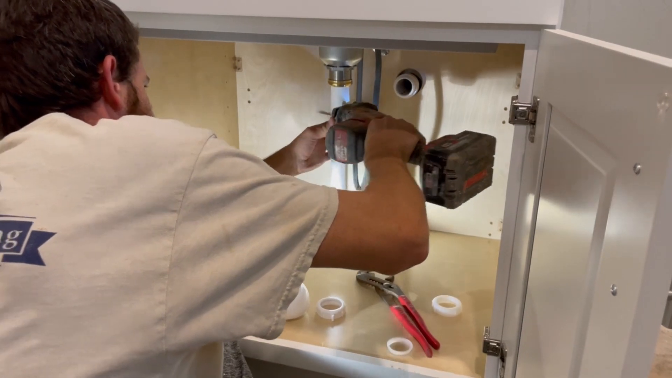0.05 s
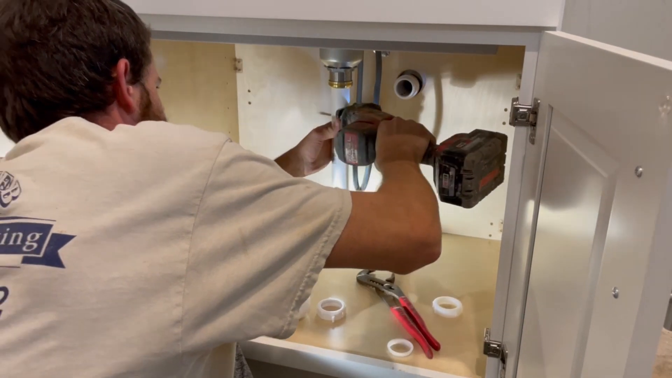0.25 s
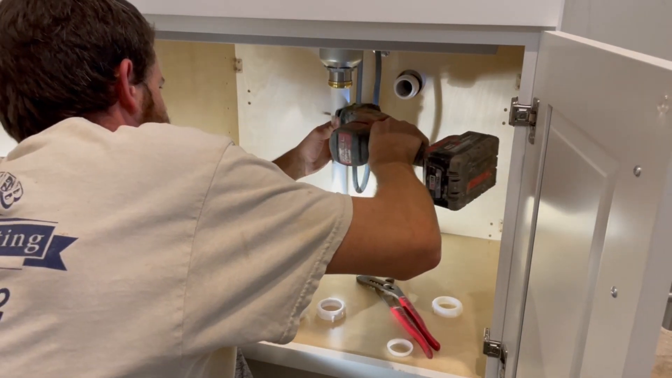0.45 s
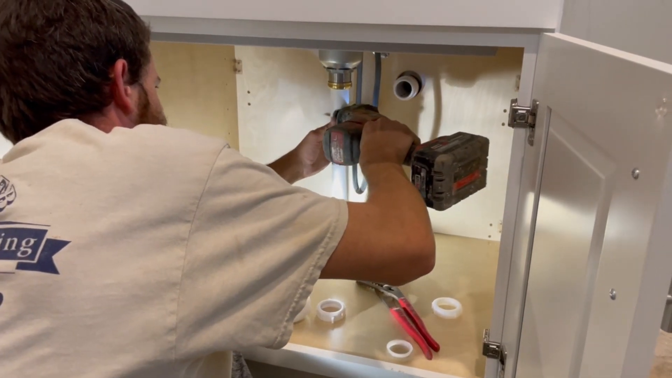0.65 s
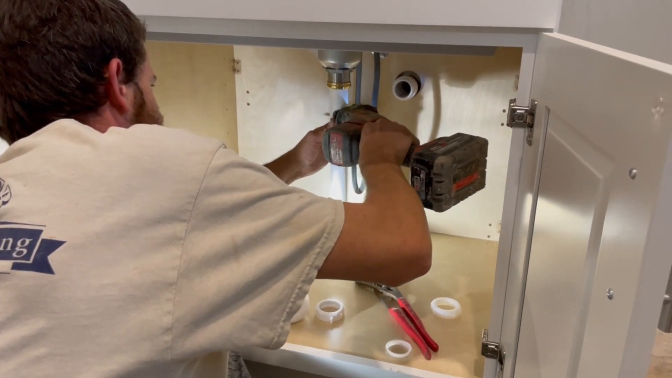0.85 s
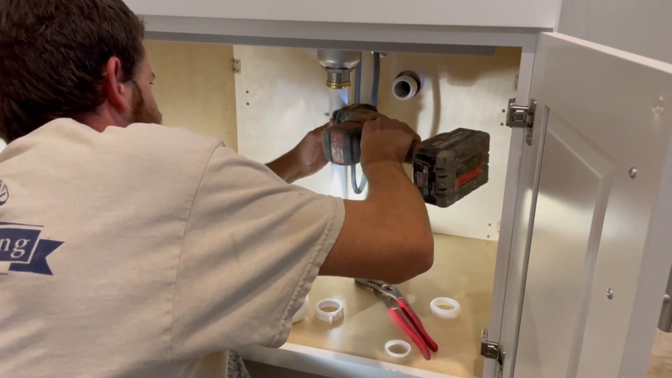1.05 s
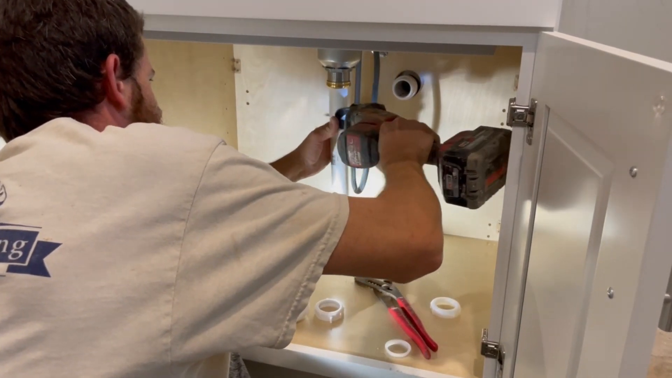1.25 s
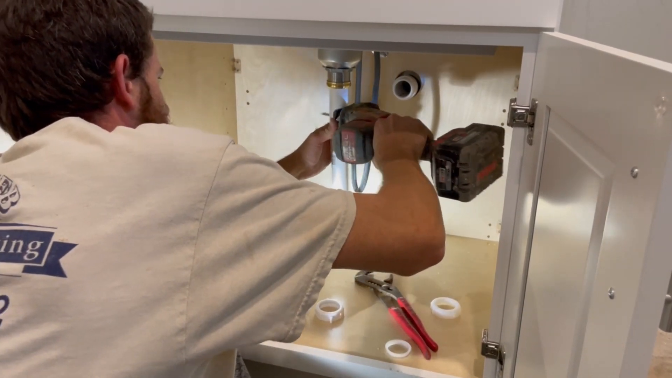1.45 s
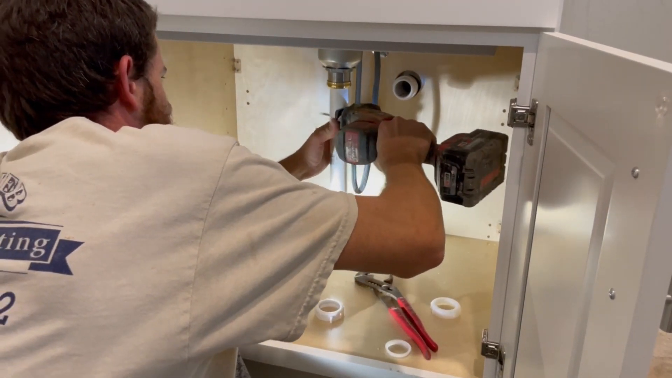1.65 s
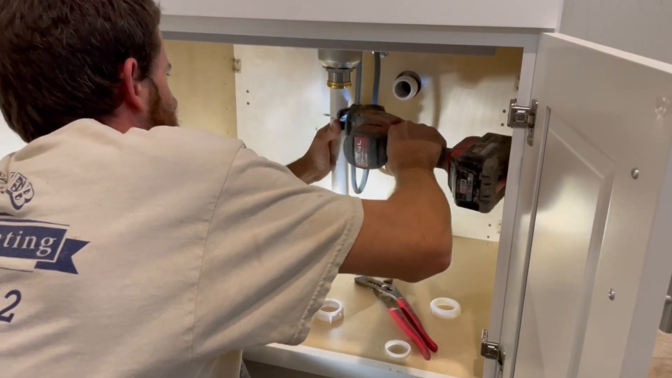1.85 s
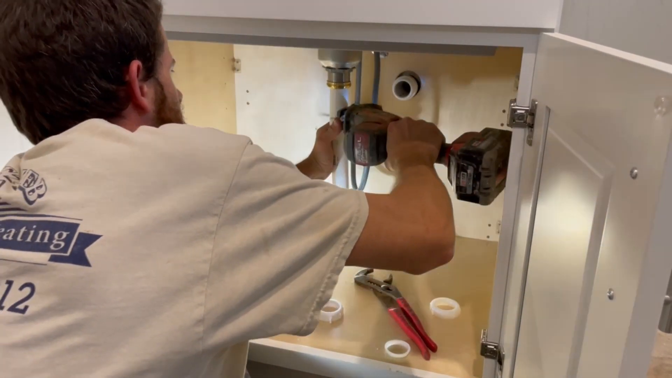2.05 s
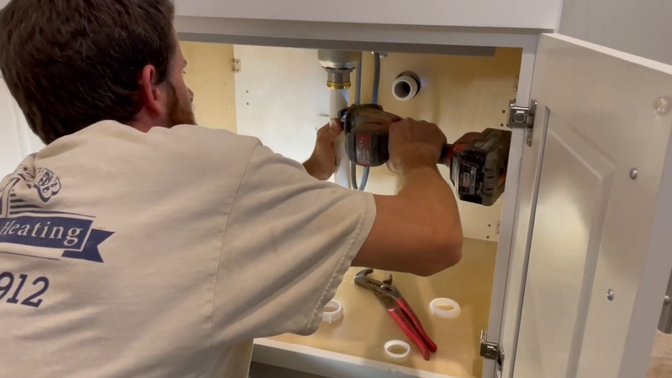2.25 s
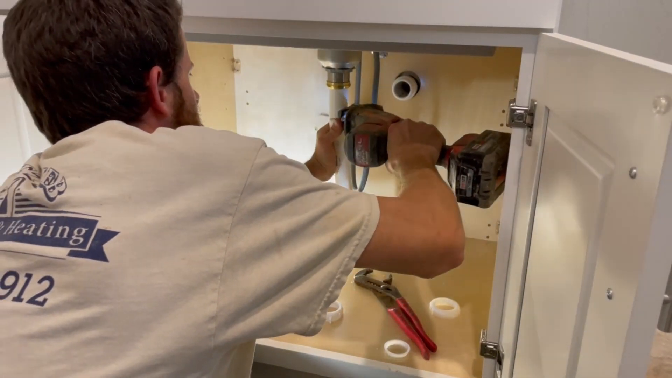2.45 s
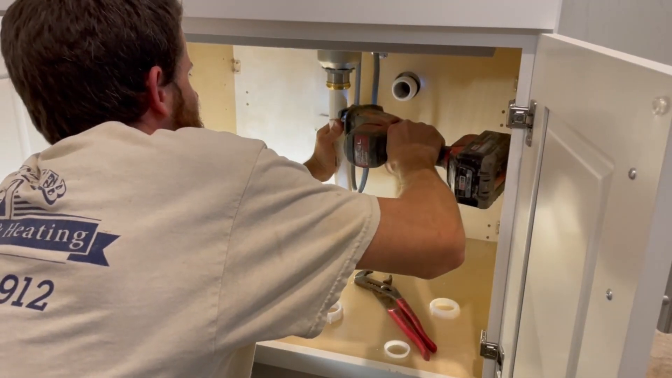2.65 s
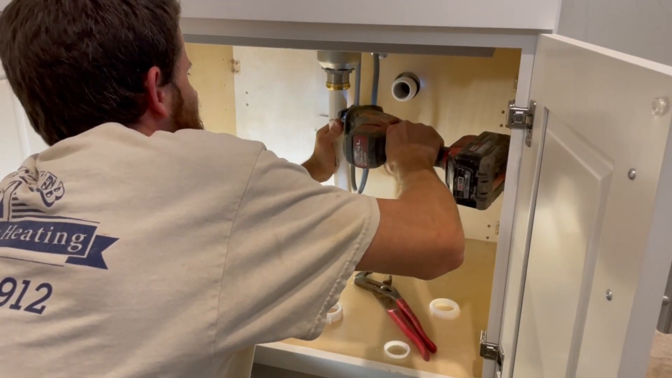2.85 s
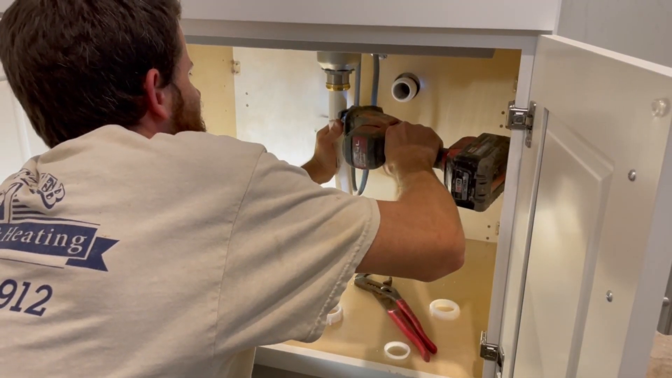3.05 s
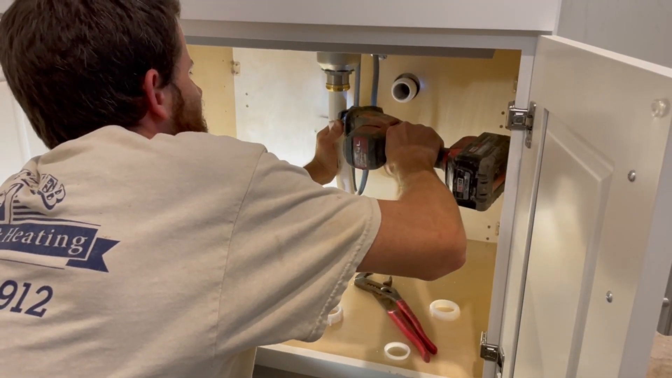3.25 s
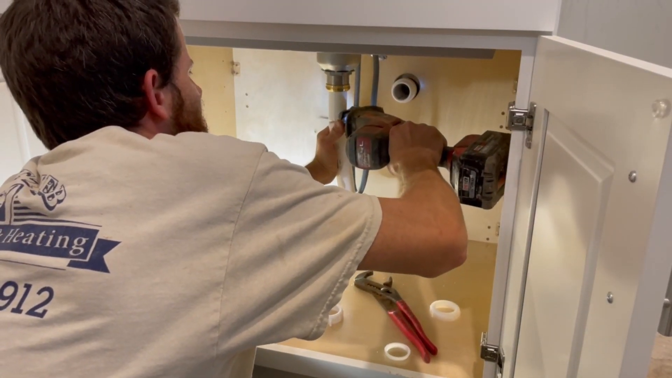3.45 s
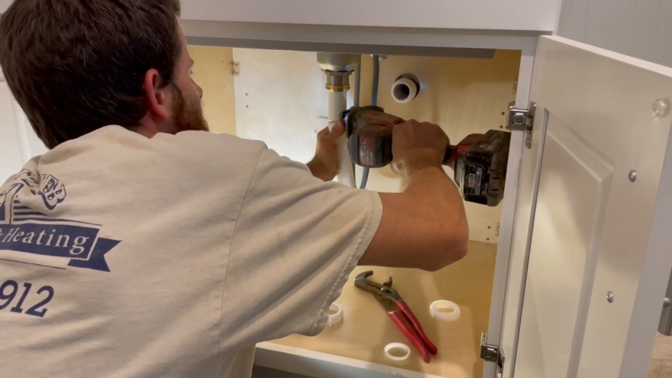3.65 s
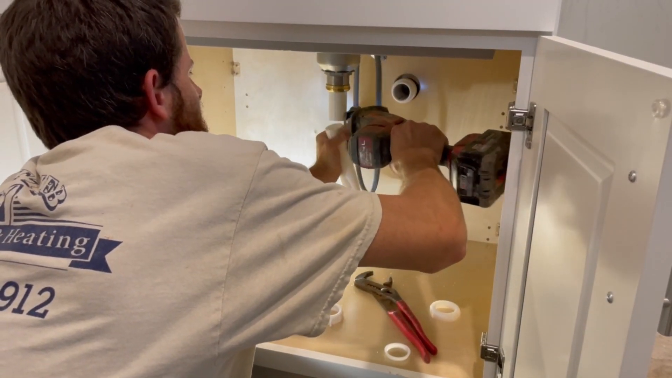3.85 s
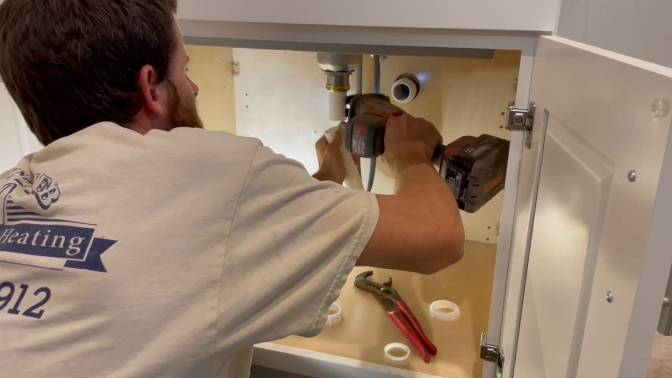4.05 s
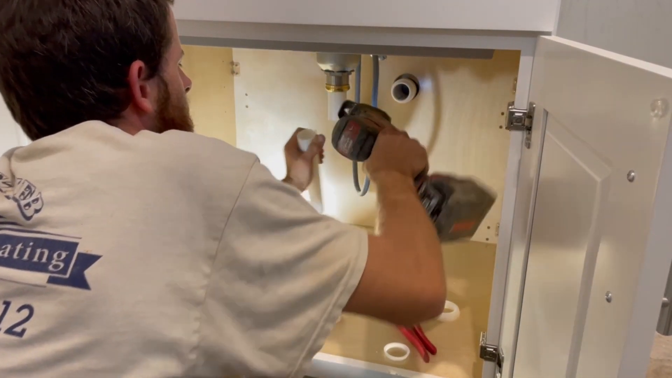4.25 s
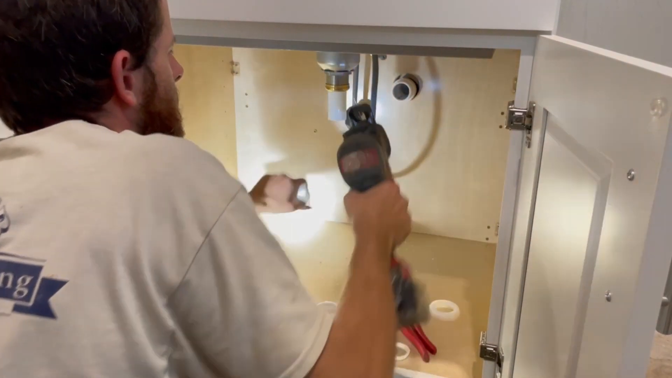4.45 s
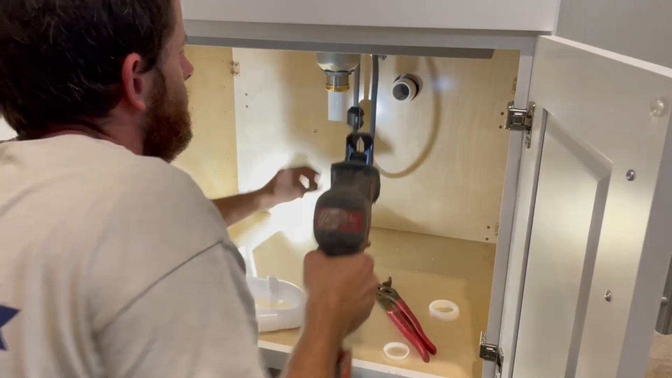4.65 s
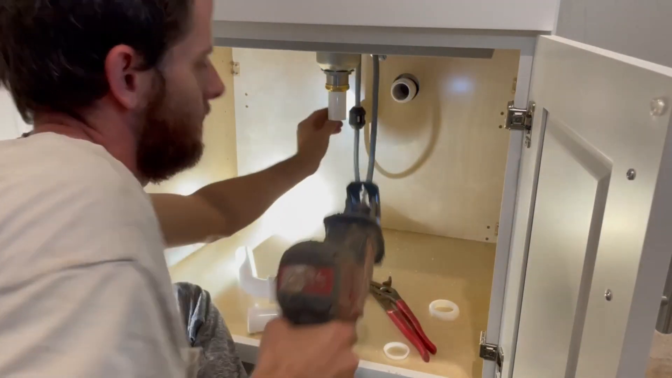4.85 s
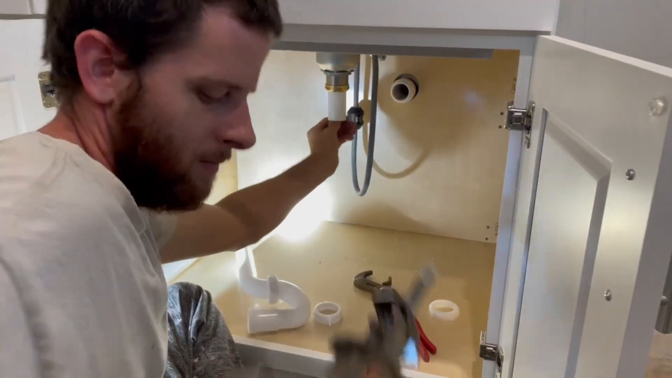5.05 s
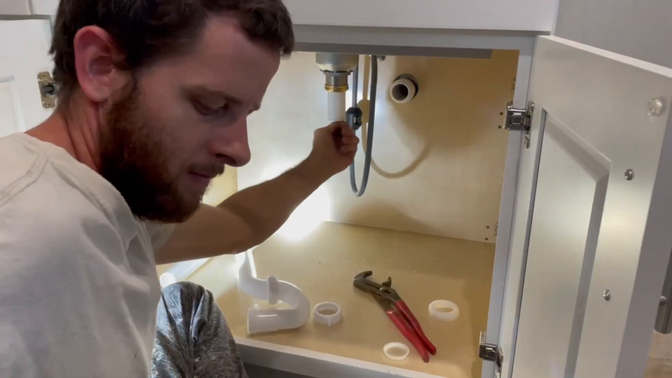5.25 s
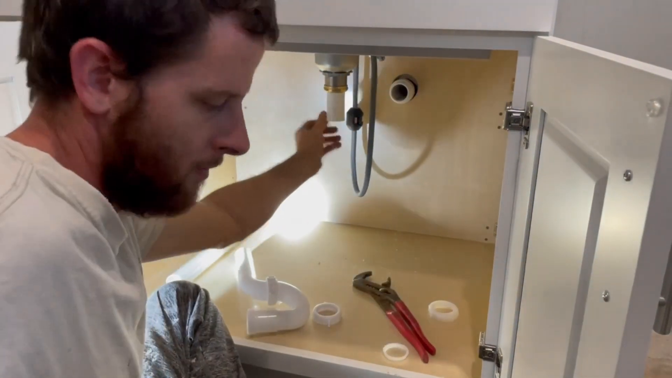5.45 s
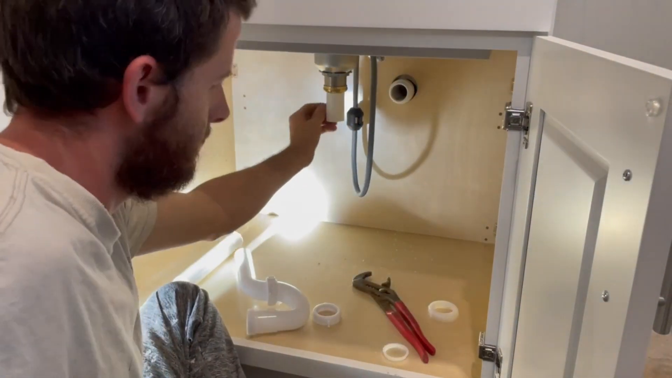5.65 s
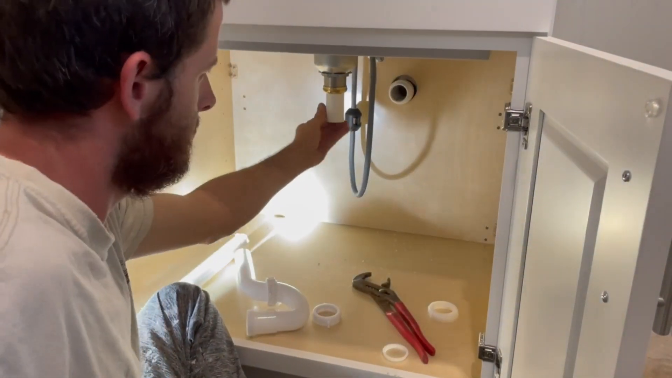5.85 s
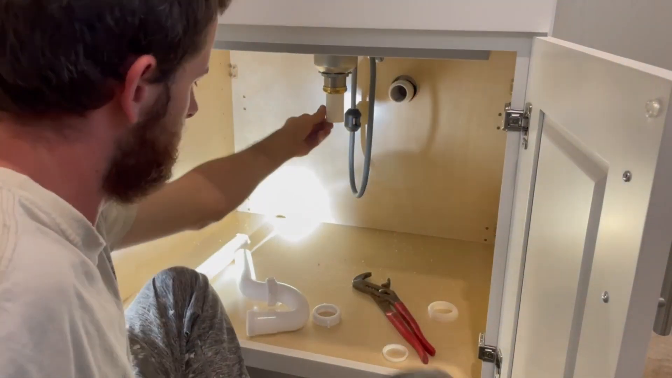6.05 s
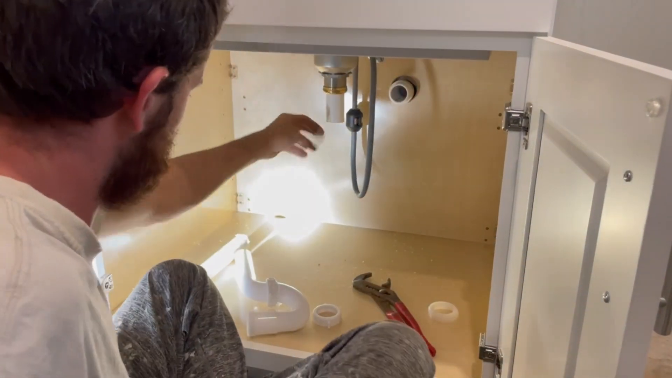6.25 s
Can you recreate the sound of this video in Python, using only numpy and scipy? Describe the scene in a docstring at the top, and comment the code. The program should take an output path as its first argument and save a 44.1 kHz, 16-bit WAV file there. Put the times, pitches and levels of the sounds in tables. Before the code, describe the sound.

A cordless reciprocating saw buzzes and rasps through a plastic drain pipe inside a wooden cabinet, sags, cuts off, then knocks on wood and a fingernail snap.

```python
"""A buzzing, rasping reciprocating saw cuts a plastic drain pipe in a wooden sink cabinet, sags and stops.
Tones at orders of the stroke shake pipe and cabinet; noise puffed twice a stroke makes the teeth's rasp and hiss.
Low lurches are decaying sines. The off-cut and the saw then knock on wood as struck modes, and noise
scrapes and a short tone make fingers picking and snapping at the pipe end.
Clothes and hands stir as filtered noise, and the small room rings briefly after each sound."""
import sys
import numpy as np
from scipy import signal
from scipy.fft import rfft, irfft, next_fast_len
from scipy.io import wavfile
from scipy.ndimage import uniform_filter1d

SR = 44100
rng = np.random.default_rng(int(sys.argv[2]) if len(sys.argv) > 2 else 0)


def output_pcm(signal):
    """Save a mono or channel-first signal as 16-bit PCM at the path in sys.argv[1].

    Samples are clipped to [-1, 1] before scaling.
    """
    pcm = np.clip(np.atleast_2d(signal).T, -1, 1) * 32767
    wavfile.write(sys.argv[1], SR, np.round(pcm).astype(np.int16))


N = 278271
TIME = np.arange(N) / SR


def amp(db):
    """dB to gain."""
    return 10 ** (np.asarray(db) / 20)


def evened(x):
    """Scales to rms 1."""
    return x / np.sqrt(np.mean(x ** 2) + 1e-20)


def read(points, hz):
    """Reads a (f/Hz, value) table on a log frequency axis."""
    f, value = np.transpose(points)
    return np.interp(np.log(hz + 1), np.log(f + 1), value)


def columns(rows):
    """Turns timed rows into curves, one value a sample, held beyond the ends."""
    s, *values = np.transpose(rows)
    return [np.interp(TIME, s, v) for v in values]


def colour(x, spectrum):
    """Filters to a spectrum; white noise keeps its rms."""
    size = next_fast_len(N, True)
    gain = amp(read(spectrum, np.fft.rfftfreq(size, 1 / SR)))
    return irfft(rfft(x, size) * evened(gain), size)[:N]


def drift(hz):
    """Slow random wander of rms 1, up to about hz."""
    steps = rng.standard_normal(int(N / SR * 60) + 2)
    smooth = signal.lfilter([1], [1, -np.exp(-2 * np.pi * hz / 60)], steps)
    return evened(np.interp(TIME * 60, np.arange(len(steps)), smooth))


def ring(x, hz, width):
    """A resonance of gain 1 at hz, steady or moving: shifts hz to zero, smooths, shifts back."""
    turn = np.exp(2j * np.pi * np.cumsum(hz * np.ones(N)) / SR)
    r = np.exp(-np.pi * width / SR)
    return 2 * (turn * signal.lfilter([1 - r], [1, -r], x / turn)).real


def add(mix, s, sound):
    """Mixes a sound in at s seconds."""
    part = mix[round(s * SR):][:len(sound)]
    part += sound[:len(part)]


JOLT_LEAD = .3  # phase of the low orders, in cycles


def order(turns, k, db, waver_db, unsteady):
    """One order of the stroke, wavering in level and phase; orders to 5 share a phase and add up to one jolt."""
    lead = JOLT_LEAD + (k > 5) * rng.random()
    level = np.sqrt(2) * amp(db + unsteady * waver_db * drift(6.0))
    return level * np.cos(2 * np.pi * (k * turns + lead + 0.019 * unsteady * drift(1.5)))


# Saw motor: t/s, stroke f/Hz, double-stroke shake level/dB, base level of the other orders/dB
SAW = [(0.0, 47.82, -26.5, -32.5), (0.55, 47.8, -21, -32.5), (0.74, 46.74, -29, -33.5),
       (0.99, 49.37, -22, -32.5), (1.19, 48.6, -18, -35.5), (1.3, 48.36, -29.5, -37),
       (1.46, 37.93, -16.5, -38.5), (1.57, 38.5, -30, -38.5), (1.63, 38.44, -17.5, -41),
       (1.7, 43, -43, -41.5), (1.8, 45.76, -17.5, -32.5), (1.915, 45.7, -34.5, -37.5),
       (2.0, 44.77, -27.5, -39), (2.12, 46.1, -23.5, -37.5), (2.29, 49.45, -32, -37),
       (3.0, 50.1, -22, -33.5), (3.47, 49.5, -17.5, -32.5), (3.9, 49.45, -25.5, -34),
       (3.97, 49.3, -41.5, -47), (4.11, 42.6, -27.5, -37), (4.24, 42.24, -29.5, -31.5)]
# How loosely the pipe is held: t/s, rattle level change/dB, share of the wavering
GRIP = [(0, 0.5, 0.44), (1.25, 1.5, 0.71), (1.45, 0, 1.9), (2.2, 3.5, 0.73), (2.45, -2, 0.27),
        (3.8, 3, 0.32), (3.95, 1.5, 0.93), (4.2, -1.5, 1.13)]
# Buzz: order of the stroke, level over the base/dB, gain as the cut deepens/dB per s, wavering/dB
ORDERS_BUZZ = [(1, -2.5, 2, 2), (3, 10.5, -2, 1.5), (4, -1, -2, 3.5), (5, -3.5, -0.5, 4), (6, -11, -1, 5),
               (7, -20, -0.16, -1.5), (8, -3.5, -0.5, 2), (9, -4.5, 0.4, 3), (10, -11.5, -0.1, 3.5),
               (11, -15.5, 2.3, -3.5), (12, -4.5, -1.5, 1)]
# One order sings out for a while: middle t/s, length/s, order, level gain at the middle/dB
SWELLS = [(1.0595, 0.63, 5, 13), (1.24, 0.39, 4, 12.5), (1.4, 0.18, 3, 11), (1.811, 0.4, 4, 10),
          (2.9, 1.4, 5, 6.5), (2.515, 0.77, 8, 11), (2.95, 1.8, 9, 4.5), (3.62, 0.7, 7, 26),
          (3.736, 0.37, 8, 16), (4, 0.79, 4, 12), (4.13, 0.087, 3, 13.5), (1.1, 0.45, 8, 8),
          (0.097, 1, 8, 7.5), (1.64, 0.3, 3, 9), (3.2, 0.9, 6, 10), (4.11, .14, 5, 10.5),
          (3.76, 0.41, 12, 12), (2.7, 1.1, 10, 12), (1.8, 0.16, 9, 6.5)]
# Loose rattle spectrum: f/Hz, relative level/dB per Hz
RATTLE = [(35, -31), (60, -3), (120, -1.5), (300, -10), (400, -3.5), (650, -12), (900, -26.5)]
RATTLE_DB, RATTLE_DB_PER_S = -24, -2  # at t = 0 before grip; the pipe rattles less as the cut deepens


def shake():
    """The blade reverses twice a stroke and shakes pipe and cabinet at orders of the stroke."""
    hz, double_db, buzz_db = columns(SAW)
    turns = np.cumsum(hz) / SR
    rattle_db, unsteady = columns(GRIP)
    tones = order(turns, 2, double_db, 0.55, unsteady)
    for k, db, gain_db, waver_db in ORDERS_BUZZ:
        swell_db = sum(top_db * np.cos(np.pi * np.clip((TIME - s) / length, -.5, .5)) ** 2
                       for s, length, which, top_db in SWELLS if round(which) == round(k))
        order_db = buzz_db + db + gain_db * TIME + swell_db
        tones += order(turns, round(k), order_db, waver_db, unsteady)
    # the loose pipe also rattles out of step
    loose_gain = amp(RATTLE_DB + RATTLE_DB_PER_S * TIME + rattle_db)
    loose = loose_gain * colour(rng.standard_normal(N), RATTLE)
    stopping = np.clip((SAW[-1][0] - TIME) / 0.12, 0, 1)
    return hz, turns, (tones + loose) * stopping


# Rasp spectrum: f/Hz, relative level/dB per Hz
RASP = [(400, -30), (650, -6.5), (1300, -8), (2400, -9), (3500, -10.5), (5500, -13.5), (6500, -9),
        (8000, -23.5)]
# Hiss spectrum: f/Hz, relative level/dB per Hz
HISS = [(4500, -32), (6000, -8), (7500, 4), (8300, 5), (9000, -1.5), (10300, 3), (12500, -4),
        (15800, -21.5)]
# Spectrum of the scratch through the outer wall: f/Hz, relative level/dB per Hz
BITE = [(1200, -7), (2300, 0), (3000, -9.5), (3900, -4), (4500, -1), (5500, -16.5), (7000, -30)]
# Pipe modes: centre f/Hz, width/Hz, relative level/dB
PIPE = [(1425, 70, -7), (1535, 32, 1), (1640, 35, -5), (1980, 60, -4), (2707, 54, -13.5), (1044, 42, -8.5),
        (4430, 180, -10)]
RASP_DB, HISS_DB = -26.5, -27  # at full speed, t = 0
HISS_DB_PER_S = -0.37  # the hiss eases as the cut deepens
SAG_BELOW_HZ = 47.7  # slower strokes than this lose level
RASP_SAG_DB, HISS_SAG_DB = 0.4, 0.7  # lost per stroke a second of sag
FIRST_BITE_DB, FIRST_BITE_S = -29.5, 0.55  # a brighter scratch while the teeth cross the outer wall
WALL_DB, WALL_DB_PER_S = -5, 1  # pipe modes under 1800 Hz ring more as the wall thins
PINCH_S, PINCH_LENGTH_S, PINCH_DB = 1.28, 0.06, -10.5  # the kerf pinches the blade and lowers the hiss
RELEASE_S, RELEASE_SOFT_S = 4.085, 0.027  # trigger let go
RASP_FALL_DB_PER_S, HISS_FALL_DB_PER_S = 379, 394.5
WANDER = .004  # the pipe modes shift by this share (rms) as the cut opens and closes


def teeth(hz, turns):
    """Teeth puff noise hardest on the pull, less on the push, and ring the pipe; bites differ in strength."""
    sag = np.clip(SAG_BELOW_HZ - hz, 0, None) * (TIME < RELEASE_S - .1)
    coast = RELEASE_SOFT_S * np.logaddexp(0, (TIME - RELEASE_S) / RELEASE_SOFT_S)  # s since release, soft start
    rasp_db = RASP_DB - RASP_SAG_DB * sag - RASP_FALL_DB_PER_S * coast
    hiss_db = HISS_DB + HISS_DB_PER_S * TIME + 1.3 * drift(2.9)
    hiss_db -= HISS_SAG_DB * sag + HISS_FALL_DB_PER_S * coast
    hiss_db += PINCH_DB * np.exp(-((TIME - PINCH_S) / PINCH_LENGTH_S) ** 2)
    wall_db = WALL_DB + WALL_DB_PER_S * TIME
    # one random strength for each half stroke
    halves = (2 * turns).astype(int)
    bite_db = uniform_filter1d(rng.standard_normal(halves[-1] + 1)[halves], 150)
    pull = np.exp(3.2 * (np.cos(2 * np.pi * (turns - .22)) - 1))
    push = np.exp(7.7 * (np.cos(2 * np.pi * (turns - .75)) - 1))
    # single teeth catching make the noise spiky
    catches_db = 3.4 * np.minimum(rng.exponential(1, (2, N)), 4)
    chips = rng.standard_normal((2, N)) * amp(catches_db)
    puffs = chips[0] * (1 + 0.65 * pull + 0.6 * push) * amp(.8 * bite_db)
    outer = amp(FIRST_BITE_DB) * np.exp(-(TIME / FIRST_BITE_S) ** 2) * evened(colour(puffs, BITE))
    pipe = np.zeros(N)
    for f, width, db in PIPE:
        mode_gain = amp(db + wall_db * (f < 1800) + 1.5 * drift(4.0))
        pipe += mode_gain * evened(ring(puffs, f * (1 + WANDER * drift(1.5)), width))
    rasp = evened(colour(puffs, RASP)) + .4 * pipe
    hiss_puffs = chips[1] * (1 + 1.3 * pull + 0.2 * push) * amp(1.3 * bite_db)
    hiss = evened(colour(hiss_puffs, HISS))
    return outer + amp(rasp_db) * rasp + amp(hiss_db) * hiss


# Clothes and hands moving: t/s, rumble level/dB, rustle level/dB
STIR = [(4.2, -45.5, -62), (5.13, -54.5, -59.5), (5.57, -61.5, -75), (6.31, -65, -66)]
# Rumble spectrum: f/Hz, relative level/dB per Hz
RUMBLE = [(30, -35.5), (60, 10.5), (90, 17.5), (125, 5), (250, -9), (400, -44.5)]
# Rustle spectrum: f/Hz, relative level/dB per Hz
RUSTLE = [(150, -28.5), (250, -6), (500, -7.5), (900, -18), (1500, -12.5), (3100, -27), (15800, -39)]


def stir():
    """Clothes and hands move as low rumble and soft rustle, two noises drifting in level."""
    rumble_db, rustle_db = columns(STIR)
    rumble = amp(rumble_db + 0.85 * drift(8.0)) * colour(rng.standard_normal(N), RUMBLE)
    rustle = amp(rustle_db + 3.7 * drift(12.0)) * colour(rng.standard_normal(N), RUSTLE)
    return rumble + rustle


# The blade binds and jerks the cabinet: t/s, level/dB, f/Hz
JERKS = [(1.361, -18.5, 87), (1.549, -18, 63), (1.621, -20, 71.5), (1.999, -12.5, 65.9), (3.895, -10, 75),
         (4.09, -20, 73.2)]
JERK_T60_S = .18


def jerks():
    """Low sine lurches that swell over a few ms and die away."""
    t, out = TIME[:SR // 3], np.zeros(N)
    for s, db, hz in JERKS:
        swell = 1 - np.exp(-t / 0.0049)
        add(out, s, amp(db - 60 * t / JERK_T60_S) * swell * np.sin(2 * np.pi * hz * t))
    return out


# The blade ticks free of the cut: t/s, level/dB, scrape decay/s
BLADE_TICK = (4.418, -50.5, 0.021)
# Blade modes: f/Hz, width/Hz, relative level/dB
BLADE = [(4620, 1100, -4), (8350, 90, 4), (10100, 2200, 4), (11800, 70, 0)]


def blade_tick():
    """A faint bright noise scrape that rings the blade."""
    s, db, scrape = BLADE_TICK
    t, out = TIME[:SR // 8], np.zeros(N)
    add(out, s, (1 - np.exp(-t / 0.0037)) * np.exp(-t / scrape) * rng.standard_normal(len(t)))
    modes = sum(amp(mode_db) * ring(out, hz, width) * np.sqrt(SR / width / 4)  # evens out the widths
                for hz, width, mode_db in BLADE)
    return amp(db) * modes


# Off-cut and saw strike wood: t/s, level/dB, thud over level/dB, clack over level/dB
KNOCKS = [(4.619, -29, 2.5, -3), (4.627, -21.5, 8, -19.5), (4.646, -29, -9, -1.5), (4.686, -33, 3, -15),
          (4.711, -25.5, -17.5, -13.5), (4.818, -38, -11, -10), (4.837, -42, -2, -9), (4.865, -33, -7, -7),
          (4.874, -26.5, -6.5, -5), (4.885, -21, -3.5, -3.5), (4.897, -24, -0.5, -25),
          (4.921, -29.5, 3.5, -11.5), (5.034, -22.5, -8.5, -6), (5.047, -24.5, -3, -29),
          (5.119, -33, 5, -20), (5.165, -35.5, 3, -10), (5.193, -39, 2.5, -18), (5.375, -57, 11.5, 0)]
# Wood modes, the first two for the thud: f/Hz, relative level/dB, t60/s
WOOD = [(145, 0, .26), (248, -13, .2), (340, -8, .03), (450, -4, .025), (580, 0, .022), (750, 0, .018),
        (1000, -3, .012)]
# Clack spectrum: f/Hz, relative level/dB per Hz
CLACK = [(600, -16), (1300, -3.5), (2000, -4), (2900, -9.5), (4000, -20), (6000, -30.5)]
# Ringing of the hard rim: f/Hz, width/Hz, level over the clack/dB
HARD = [(2820, 130, 9.5), (3520, 130, 2)]
# Tick spectrum: f/Hz, relative level/dB per Hz
TICK = [(3000, -11.5), (4600, 0), (6500, 1), (12000, -10.5), (15800, -33)]
BODY_DB, TICK_DB = -19.5, -11  # upper wood modes over the knock level; tick over the clack


def knocks():
    """A blow thuds in the low modes; its cluster of jolts rings the rest, each piece struck tuned its own way."""
    t = TIME[:SR // 4]
    jolts = rng.standard_normal((len(KNOCKS), 3, len(t)))
    bounces = uniform_filter1d(rng.standard_normal((len(KNOCKS), 1, len(t))), 60)
    jolts *= amp(3.5 * evened(bounces) - 1.5)
    pieces = rng.standard_normal((len(KNOCKS), 2, len(WOOD), 1))
    hz, mode_db, t60 = np.transpose(WOOD)[:, :, None]
    thud = (amp(mode_db - 60 * t / t60) * np.sin(2 * np.pi * hz * t))[:2].sum(0)
    wood, clack, tick = np.zeros((3, N))
    fade = (1 - np.exp(-t / 0.00099)) * np.exp(-t / 0.011)
    crack = (1 - np.exp(-t / 0.0016)) * np.exp(-t / 0.0097)  # hard contact: softer start, sooner gone
    push = np.hanning(220) * np.sin(2 * np.pi * np.arange(220) / 220) / 110
    for (s, db, thud_db, clack_db), jolt, (louder, higher) in zip(KNOCKS, jolts, pieces):
        decay = amp(mode_db + 2.5 * louder - 60 * t / t60)
        modes = decay * np.sin(2 * np.pi * hz * (1 + .07 * higher) * t)
        body = evened(signal.oaconvolve(fade * jolt[0], modes[2:].sum(0)))
        add(wood, s, amp(db + thud_db) * np.convolve(push, thud))
        add(wood, s, amp(db + BODY_DB) * body)
        add(clack, s, amp(db + clack_db) * crack * jolt[1])
        add(tick, s, amp(db + clack_db + TICK_DB) * crack * jolt[2])
    hard = sum(amp(db) * ring(clack, f, width) for f, width, db in HARD)
    return wood + colour(clack, CLACK) + hard + colour(tick, TICK)


# Fingers picking at the cut end: t/s, level/dB, scrape decay/s, fitting knock over level before halving/dB
SNAPS = [(5.992, -60, 0.043, -10), (6.083, -46, 0.005, -25), (6.088, -29.5, 0.0036, 12.5),
         (6.093, -34.5, 0.012, 0), (6.099, -40, 0.033, 1), (6.252, -54, .006, -30)]
# Fingernail spectrum: f/Hz, relative level/dB per Hz
SNAP = [(120, -23), (400, -16), (950, -14), (2000, -13.5), (4000, -19), (6500, -15), (10000, -14.5),
        (15800, -21)]
# Rim modes rung by nail and knock: f/Hz, width/Hz, level/dB
RIM = [(170, 70, 10), (400, 200, 2), (4600, 40, 9), (8500, 90, 5), (10600, 90, 5)]


def snaps():
    """Fingernail noise scrapes and one sharp snap ring the rim; a firm touch also knocks the fitting."""
    t, (fitting, nail) = TIME[:SR // 8], np.zeros((2, N))
    knock = np.cos(2 * np.pi * 980 * t) * np.exp(-t / .0018) * (1 - np.exp(-t / .0002))
    for (s, db, scrape, knock_db), jolt in zip(SNAPS, rng.standard_normal((len(SNAPS), len(t)))):
        add(nail, s, amp(db) * np.exp(-t / scrape) * jolt)
        add(fitting, s, -amp(db + knock_db) * knock)
    struck = fitting / 2 + colour(nail, SNAP)
    return struck + sum(amp(db) * ring(struck, hz, width) for hz, width, db in RIM)


# Room decay: f/Hz, t60/s
ROOM = [(100, 0.94), (1000, 0.87), (8000, 0.78), (15000, 0.25)]
# Stereo likeness: f/Hz, left-right likeness 0-1
ALIKE = [(130, 1), (300, .85), (800, .4), (2000, .45), (5000, .65), (7200, .96), (10000, .85), (13000, .8),
         (14500, .97)]
# Stereo phase: f/Hz, left relative to right/radians (negative: the left lags)
PHASE = [(4800, 0), (6200, -1.3), (6700, -3.1), (7500, -3.2), (8700, -4.2), (10400, -6.1), (11600, -6.6),
         (13900, -9.3), (15500, -9.5)]
# Stereo balance: f/Hz, left over right level/dB
LEAN = [(50, 2.5), (130, -4), (400, 0), (1200, 1), (5000, 2.5), (7000, 0)]


def heard(x, wet_db):
    """The room adds a tail of sparse taps; two close ports hear it partly alike, the right earlier in the treble."""
    taps = np.zeros((2, SR))
    at = np.arange(60, SR - 20, 20) + rng.integers(0, 20, (2, (SR - 61) // 20))
    np.put_along_axis(taps, at, rng.choice([-1., 1.], at.shape), 1)
    hz, t, z = signal.stft(taps, SR, nperseg=256)
    decayed = z * amp(-60 * t / read(ROOM, hz)[:, None])
    tails = signal.istft(decayed, SR, nperseg=256)[1][:, :SR]
    early = taps[1] * amp(-60 * TIME[:SR] / .2)  # cabinet walls, t60 0.2 s
    size = next_fast_len(N + SR)
    hz = np.fft.rfftfreq(size, 1 / SR)
    a, b, walls = (rfft(v / np.linalg.norm(v), size) for v in (*tails, early))
    wet, alike = amp(wet_db), np.clip(read(ALIKE, hz), 0, 1)
    left = 1 + wet * a
    right = alike * left + np.sqrt(1 - alike ** 2) * (walls + wet * b)
    lean = amp(read(LEAN, hz) / 2)  # half the balance on each side
    ports = np.array([left * lean, right / lean * np.exp(-1j * read(PHASE, hz))])
    return irfft(rfft(x, size) * ports / np.sqrt(1 + wet ** 2), size)[:, :N]


def moving(x, wet_db):
    """The saw shifts about, so its sound glides between three paths through the room."""
    shares = [np.sqrt(2 / 3) * np.cos(np.pi * (2.5 * TIME + k / 3)) for k in range(3)]
    return sum(share ** 2 * heard(x, wet_db) for share in shares)


def scene():
    """All sources, each with its share of room; the low shake arrives almost dry."""
    hz, turns, shaken = shake()
    low = heard(shaken + jerks() + stir(), -19)
    cut = moving(teeth(hz, turns), -8.5)
    return low + cut + heard(knocks() + snaps() + blade_tick(), -12.5)


def record(dry):
    """The microphone drops the bass under 50 Hz; a steep low-pass then limits the band to 15.8 kHz."""
    thin = signal.sosfilt(signal.butter(2, 50.0, "high", fs=SR, output="sos"), dry)
    band = signal.firwin(2047, 15800, window=("kaiser", 9), fs=SR)
    return signal.oaconvolve(thin, band[None], "same")


dry = scene()
out = record(dry)
output_pcm(out)
```